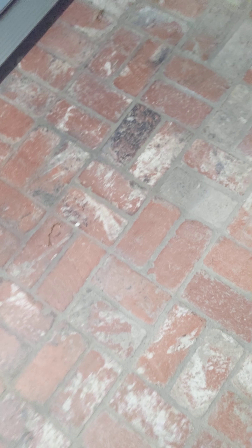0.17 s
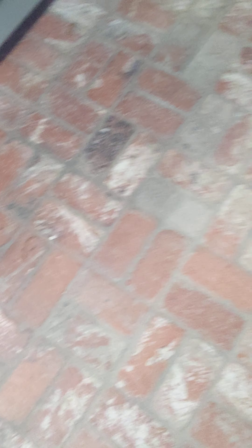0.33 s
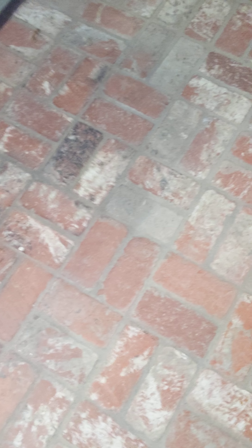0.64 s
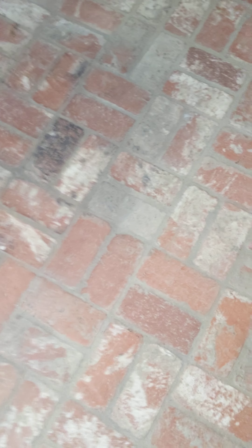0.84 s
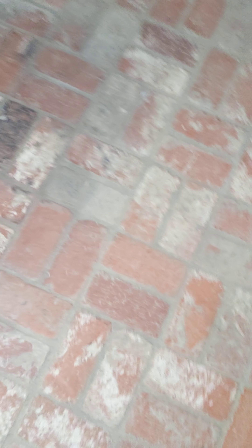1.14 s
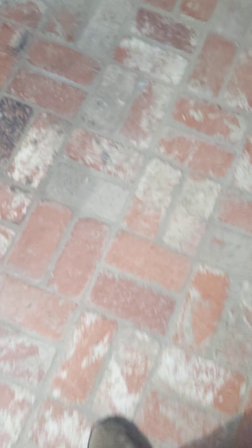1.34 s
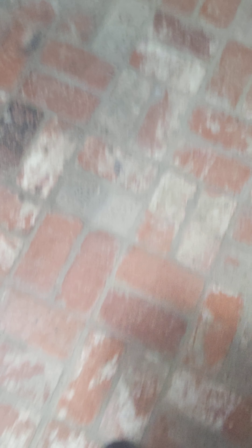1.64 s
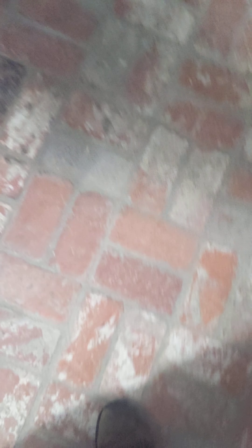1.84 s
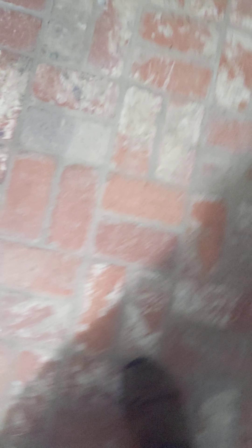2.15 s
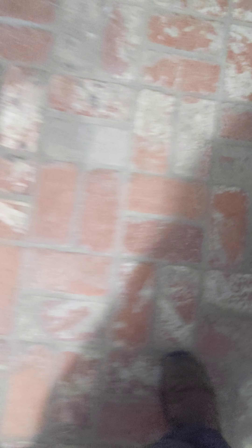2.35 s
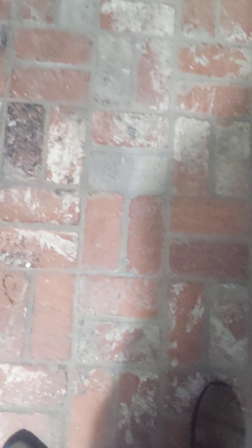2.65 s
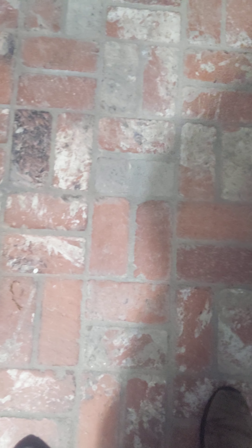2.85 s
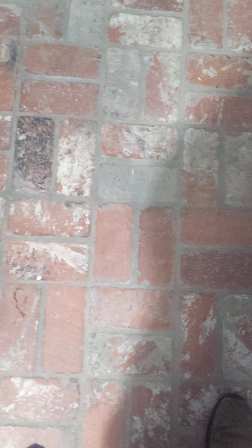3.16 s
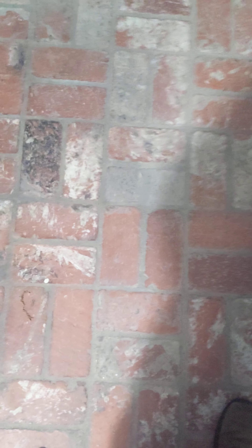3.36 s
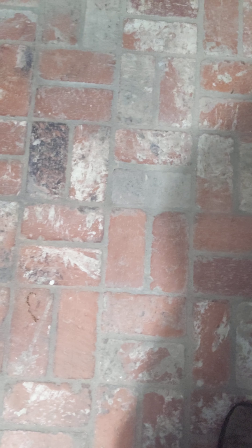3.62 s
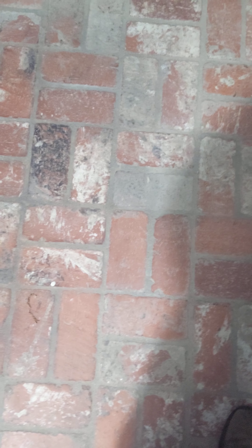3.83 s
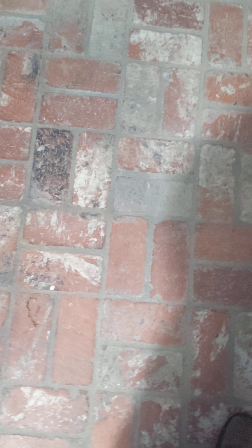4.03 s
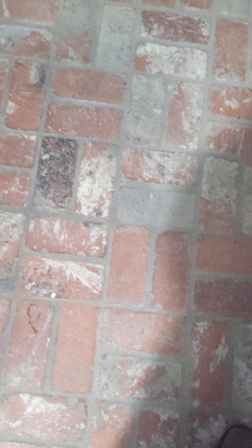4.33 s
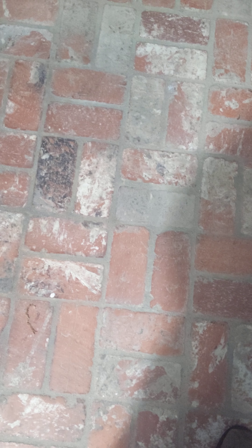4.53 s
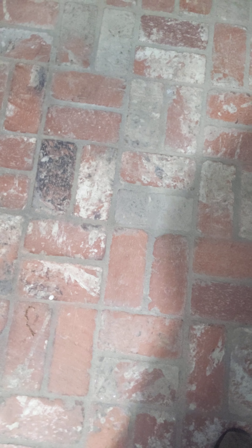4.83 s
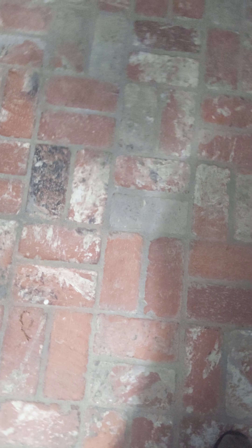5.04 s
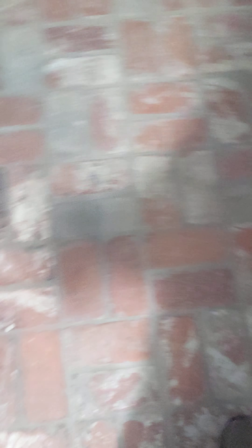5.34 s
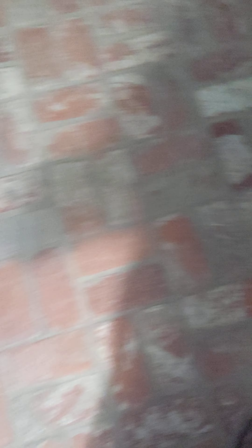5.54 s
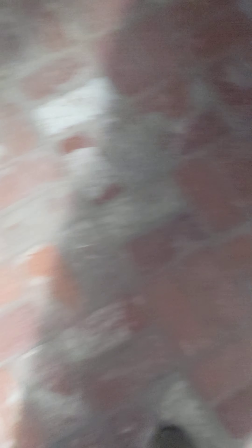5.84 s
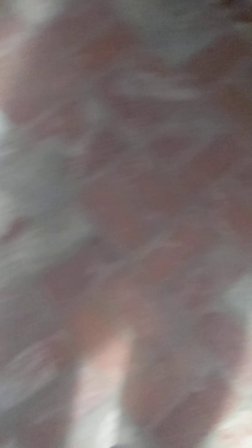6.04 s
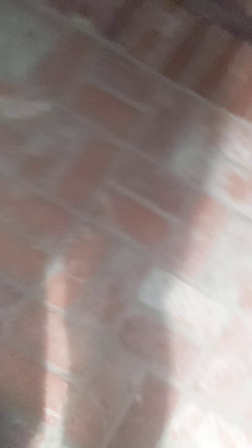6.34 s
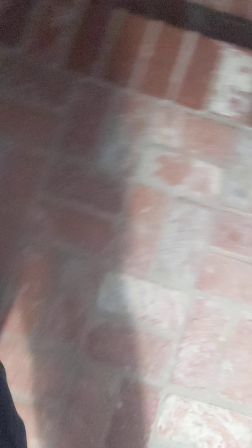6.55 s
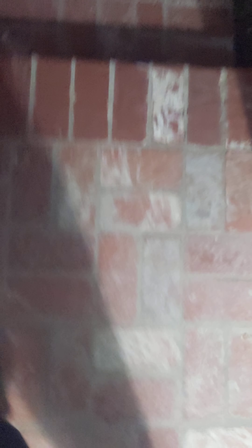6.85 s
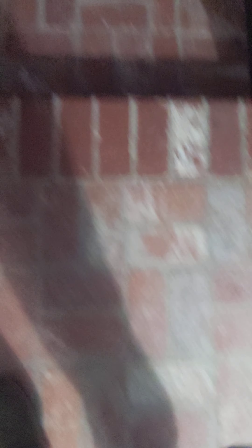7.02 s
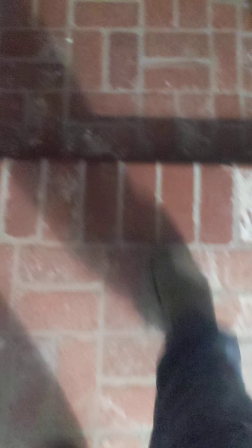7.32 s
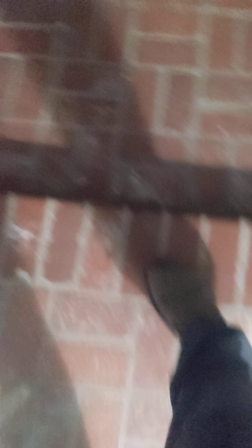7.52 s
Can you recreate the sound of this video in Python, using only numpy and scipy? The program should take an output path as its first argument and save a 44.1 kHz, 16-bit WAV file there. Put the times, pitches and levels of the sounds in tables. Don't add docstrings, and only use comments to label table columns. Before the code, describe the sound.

Outdoors in a walled brick yard, a phone's microphones pick up muffled grip rumbles, cloth hiss and small clicks. A heavy double knock on the case jolts and distorts at about two seconds. Seven crisp, woody heel taps with gritty edges and short diffuse echoes follow at uneven gaps. After a quiet pause, fabric and handling noise return, growing busier towards the end over faint street hum.

```python
import sys
import numpy as np
from scipy import signal
from scipy.fft import rfft, irfft
from scipy.io import wavfile
from scipy.ndimage import uniform_filter1d

SR = 44100
rng = np.random.default_rng(int(sys.argv[2]) if len(sys.argv) > 2 else 0)


def dump(signal):
    limited = np.clip(np.atleast_2d(signal).T, -1, 1)
    pcm = np.round(limited * 32767).astype(np.int16)
    wavfile.write(sys.argv[1], SR, pcm)


def volts_from_decibels(level):
    exponent = np.asarray(level, float) / 20
    return 10 ** exponent


N = 338688
BETWEEN_PORTS = np.array([[1], [-1]])

# start_s, blow_db, sole_db, edge_db, thump_db
HEEL_TAPS = [
    (2.717, -18.5, -9.5, -25, -4),
    (3.048, -13.5, -10, -15.5, -4.5),
    (3.235, -15, -4, -19, -6.5),
    (3.407, -17.5, -7.5, -23, -47),
    (3.769, -12, -2, -9.5, -11),
    (4.461, -16.5, -5.5, -15.5, -4.5),
    (4.802, -14, -3, -10, -4),
    (5.499, -31, -9, -21, -37),
]
RIM_LEVELS = [-24, -16, -10, -16, -16, -17, -21.5, -13]
# pitch_hz, level_db, t60_s
THUMP_MODES = [(186, -3.5, 0.038), (250, -9.5, 0.025)]
# pitch_hz, level_db, t60_s
BRICK_MODES = [(335, 6, 0.044), (401, 0, 0.05), (630, -6, .06), (460, -9.5, 0.15)]
# pitch_hz, level_db, t60_s
SOLE_MODES = [(710, -7.5, 0.053), (817, -8, 0.1), (926, -0.5, 0.035), (999, -3, 0.043), (1168, -3, 0.026)]
# pitch_hz, level_db, t60_s
EDGE_MODES = [(1326, -13, .03), (1440, -5, 0.036), (1774, -9, 0.023), (2324, -14, .025)]
# pitch_hz, level_db, t60_s
RIM_MODES = [(1594, 3.5, 0.049), (2000, -16, .03), (2280, -11.5, 0.051)]
# pitch_hz, level_db, t60_s
GROUND_MODES = [(68, 0, 0.14)]
# pitch_hz, level_db, t60_s
LOOSE_MODES = [(297, 0, .8), (311, -5, .5)]
# delay_s, level_db
BOUNCES = [
    (0, 0),
    (.0105, -15),
]
# frequency_hz, density_db (per Hz)
GRIT_COLOUR = [(1060, -30), (1800, -12), (2460, -0.5), (3480, 1.5), (5540, -8), (6650, -10), (7560, -13),
               (8360, -14), (16000, -24.5)]
# frequency_hz, t60_s
YARD_DECAY = [(120, 0.45), (330, 0.24), (870, 0.33), (2300, 0.27), (6000, 0.69), (12000, 0.29)]
# frequency_hz, likeness (0-1)
YARD_SAME = [(100, 0.93), (400, 0.67), (1000, 0.86), (3000, 0.32), (10000, 0.48)]
# frequency_hz, density_db (per Hz)
YARD_COLOUR = [(20, 0), (20000, 0.0087)]

# start_s, level_db, pitch_hz, cycles to die, way (push +1, pull -1)
CASE_KNOCKS = [(0.093, -22, 45, 1.7, -1), (0.109, -21.5, 236, 2.7, 1), (0.116, -15.5, 218, 1.3, 1),
               (0.129, -25.5, 132, 4.4, 1), (0.339, -38, 447, 6.4, 1), (0.345, -26.5, 465, 45, -1),
               (2.083, -14, 111, 2.2, -1), (2.0944, -5.5, 570, 2.5, 1), (2.0976, -2.5, 406, 2.4, 1),
               (2.098, -5.5, 930, 3, 1), (2.0998, -13.5, 250, 0.86, -1), (2.112, -17, 200, 3.4, 1),
               (2.117, -7, 535, 2.7, 1), (2.1264, -4, 113, 0.97, -1), (2.131, -0.5, 263, 1.56, 1),
               (2.148, -20, 576, 16, 1), (2.204, -33, 524, 17, 1), (2.22, -31, 563, 24, -1),
               (2.287, -21, 35.5, 2.3, -1), (6.047, -19.5, 133, 1.1, -1), (6.236, -18, 167, 1.5, -1),
               (6.248, -30, 187, 4.7, -1), (7.152, -17, 68, 2.4, 1), (7.224, -19, 34.3, 3, 1),
               (0.902, -29, 111, 2.3, 1), (.932, -30, 171, 2.3, 1), (0.9372, -20, 150, 1.7, 1),
               (0.95, -21, 55.6, 2.5, 1), (0.965, -30, 89, 3.8, 1), (1.318, -17.5, 94, 1.9, 1),
               (1.6758, -11.5, 118, 1.15, 1), (2.03, -22, 150, 1.6, 1), (5.6798, -25.5, 407, 3.4, -1),
               (5.692, -33, 150, 2.2, -1), (6.549, -21.5, 32, 2, -1), (6.853, -25, 710, 3.4, 1),
               (6.915, -16, 800, 2.6, 1), (6.952, -10, 660, 4, 1), (7.658, -20, 95, 11, -1)]
# frequency_hz, level_db
TWIST = [(40, -18), (110, -4), (250, 1.5), (580, 2), (900, -11)]
# start_s, level_db, length_s, first_top_hz, last_top_hz
PALM_SLIDES = [
    (2.096, -16, 0.11, 1850, 250),
    (2.135, -22.5, 0.16, 650, 500),
    (2.18, -28, 0.13, 900, 310),
    (9.9, -42, 0.06, 540, 470),
    (7.3, -46, .04, 760, 400),
    (0.57, -38, 0.059, 920, 500),
]
# frequency_hz, density_db (per Hz)
SLIDE_COLOUR = [(90, -28), (240, -6), (400, 8), (650, 0.5), (5000, -17.5)]
# frequency_hz, likeness (0-1)
SLIDE_SAME = [(90, 0.69), (400, 1), (900, 0.23)]
# frequency_hz, left lead (radians)
SLIDE_TURN = [(90, -12.5), (400, -1), (1200, -6)]
# start_s (peak), level_db, rise_s, fall_s
ARM_SWINGS = [(.108, -34, 0.048, 0.12), (.428, -42, 0.13, 0.075), (.946, -33, 0.1, 0.084),
              (1.322, -41.5, 0.059, 0.095), (1.5, -46, 0.37, 0.074), (1.675, -39, 0.043, 0.086),
              (2.0, -41.5, 0.2, 0.36), (2.1, -15, 0.018, 0.036), (2.31, -36, 0.24, 0.077),
              (5.51, -57, 0.085, 0.036), (6.05, -39.5, 0.011, 0.085), (6.57, -36, 0.034, 0.1),
              (6.86, -31.5, 0.13, 0.58), (7.24, -35.5, 0.2, 0.14), (7.6, -45, 0.25, 0.067)]
# start_s (peak), squeeze_db, rise_s, fall_s, rub_db (over the squeeze)
FINGER_SHIFTS = [(.001, -55, .05, 0.24, 4.5), (.108, -37, 0.033, 0.34, -10), (.35, -30, 0.061, 0.092, -4),
                 (.566, -52, 0.88, 0.049, -19), (.68, -45.5, 0.078, 0.046, -13),
                 (.946, -35, 0.11, 0.099, -19), (1.086, -46, 0.016, 0.15, -30),
                 (1.322, -42.5, 0.022, 0.062, -32), (1.388, -52, 0.032, 0.099, 1.5),
                 (1.5, -53, 0.25, 0.11, -20), (1.676, -42.5, 0.035, 0.12, -31),
                 (2.036, -38.5, 0.074, 0.087, -9.5), (2.102, -24, 0.023, 0.093, -11),
                 (2.215, -42, 0.085, 0.11, -10), (5.505, -46, 0.033, 0.082, 3),
                 (5.686, -49.5, 0.019, 0.077, -0.5), (6.24, -33, 0.022, 0.13, -15.5),
                 (6.56, -52, 0.023, 0.81, 4.5), (6.74, -46, 0.081, 0.038, 6),
                 (6.86, -31.5, 0.083, 0.3, -0.5), (6.915, -32.5, 0.095, .04, 0.5),
                 (6.955, -35, 0.0067, 0.14, -2.5), (7.13, -38, 0.84, 0.23, 0.5),
                 (7.22, -38.5, 0.071, 0.059, -1), (7.35, -46.5, 0.24, 0.14, 7), (7.55, -52, 0.22, 1, 8),
                 (7.68, -30, 0.079, .1, -12.5)]
# start_s, level_db
UNREST = [(0, -43), (.5, -51.5), (.85, -57), (1.5, -46.5), (2.05, -54), (2.68, -58), (2.74, -93),
          (5.15, -104), (5.22, -62), (6.4, -70.5), (6.6, -54), (7.68, -39.5)]
# start_s, level_db, pitch_hz, pan_db (left over right)
CASE_BUMPS = [(0.107, -49, 143, -17), (0.344, -49, 457, 2), (0.899, -48, 116, 0), (0.942, -49.5, 166, 30),
              (1.08, -38.5, 243, -0.5), (1.363, -37.5, 105, 3), (1.429, -46, 105, 11),
              (1.487, -51, 102, -6), (1.675, -59, 103, -5), (1.915, -43, 500, 4), (2.094, -20.5, 300, -15),
              (2.128, -25, 150, -4), (5.286, -45, 506, -2.5), (5.682, -52, 300, 7), (6.047, -36, 310, -5),
              (6.236, -29.5, 296, -8), (6.551, -36, 104, -1), (6.953, -25, 620, -2),
              (7.643, -29.5, 105, -1)]
# frequency_hz, density_db (per Hz)
SWAY_COLOUR = [(15, 8.5), (30, -3.5), (60, -4.5), (100, -1.5), (160, -68)]
# frequency_hz, density_db (per Hz)
SQUEEZE_COLOUR = [(60, -22), (100, 7.5), (180, 12.5), (330, 3), (500, -59)]
# frequency_hz, density_db (per Hz)
RUB_COLOUR = [(220, -18), (380, -1), (700, -6), (1000, -11.5), (1250, -19), (1600, -17.5), (3000, -78)]
# frequency_hz, density_db (per Hz)
RATTLE_COLOUR = [(60, -31), (150, 2), (500, 10.0), (900, -2.5), (1400, -21), (3000, -78)]
# frequency_hz, likeness (0-1)
CASE_SAME = [(30, 1), (100, 0.86), (300, 0.76), (800, 0.68), (1500, 1)]
# frequency_hz, left lead (radians)
CASE_TURN = [(30, 1.73), (80, -0.5), (260, -2.5), (600, -3), (1200, -6)]

# start_s (peak), rustle_db, rise_s, fall_s, scrape_db (over the rustle)
SLEEVE_STROKES = [
    (.001, -47, .05, 0.14, -20),
    (.11, -44.5, 0.028, 0.06, -20),
    (.25, -39, 0.26, 0.28, -15.5),
    (.2, -44.5, 0.063, .05, -12),
    (.29, -43.5, 0.026, 0.091, -4),
    (.335, -48.5, 0.13, 0.026, -6),
    (.35, -45.5, 0.095, 0.05, 4),
]
# start_s (peak), rustle_db, rise_s, fall_s, scrape_db (over the rustle)
LEG_STROKES = [(.375, -46.5, 0.0032, 0.0054, 12.5), (.382, -60, .006, 0.065, 0),
               (.535, -52.5, 0.004, 0.023, -1.5), (.56, -60, .03, .06, -6), (1.2, -66, 0.33, 0.22, -8),
               (1.366, -45.5, 0.005, 0.2, -12.5), (1.64, -56.5, 0.62, 0.093, -8),
               (1.98, -56.5, 0.093, 0.34, -9), (2.534, -50.5, 0.082, 0.25, -8.5),
               (2.568, -49, 0.085, 0.12, -19), (2.71, -67, 0.085, .05, -9), (5.34, -67.5, 0.46, 0.19, -4),
               (5.509, -51.5, 0.039, 0.1, 2), (6.237, -52.5, 0.0067, 0.13, -3),
               (6.31, -48.5, 0.14, 0.019, -16), (6.6, -55.5, 0.26, 0.18, -14),
               (6.741, -47.5, 0.2, 0.013, 0), (6.86, -38.5, 0.067, 0.18, 1.5),
               (6.92, -44, 0.25, 0.045, 7.5), (6.953, -50, 0.0055, 0.4, 7.5), (7.1, -37, 0.23, 0.38, -1.5),
               (7.35, -50, 0.11, 0.058, 6.5), (7.389, -44.5, 0.0068, 0.088, -16),
               (7.551, -47, 0.14, 0.17, 0.5), (7.646, -41.5, 0.005, 0.011, 4),
               (7.659, -52, 0.009, 0.0058, 16.5)]
# start_s, level_db
SWISH = [(0, -63), (.35, -53), (.37, -65), (.72, -70.5), (1.7, -65), (2.16, -72), (2.25, -64), (2.7, -74.5),
         (2.76, -100), (5.05, -100), (5.12, -80), (5.63, -69.5), (6.45, -65.5), (7.68, -81)]
# start_s, level_db, pan_db (left over right)
TICKS = [(0.0554, -53, 0), (0.0944, -29, 11), (.1775, -47, 0), (0.373, -30, -4), (.4559, -50, 4),
         (0.673, -39, 1), (0.5323, -40, -9), (.536, -42, -5), (1.366, -47, 8), (1.561, -26.5, 4),
         (1.656, -36, 5), (1.96, -35, 7), (2.095, -24.5, 15), (2.102, -26, -7), (4.52, -53, 2),
         (4.551, -52, 2), (4.596, -51, 2), (5.504, -39, 4), (6.0475, -41, -15), (6.237, -29, -13),
         (6.5986, -29, 21), (6.791, -39, 8), (6.816, -38, 2), (6.9499, -32, 3), (7.3476, -27, -6),
         (7.3855, -29, -2), (7.3884, -49, 8), (7.392, -37, 5), (7.418, -33.5, 16), (7.433, -28, 8),
         (7.5485, -33, 0), (7.5333, -49, 7), (7.5614, -45, 6), (7.616, -41, -1), (7.644, -45, -7)]
# frequency_hz, density_db (per Hz)
SLEEVE_COLOUR = [(800, -30), (1400, -14), (2400, -18), (3300, -19), (3950, 2), (4700, -14), (5700, 0),
                 (6800, -10), (7800, -5), (8600, -14), (9500, -14), (10800, -18), (12500, -20),
                 (13600, -17), (16000, -21)]
# frequency_hz, density_db (per Hz)
LEGS_COLOUR = [(800, -41), (1100, -4), (2200, -13), (3400, 3.5), (4900, 3.5), (5700, 6), (6700, -3),
               (9000, -15), (12400, -22), (13700, -17.5), (16000, -21)]
# frequency_hz, likeness (0-1)
SLEEVE_SAME = [(1000, 0.51), (3000, 0.54), (5700, 0.7), (10000, 0.12), (15000, 0.15)]
# frequency_hz, likeness (0-1)
LEGS_SAME = [(1000, .4), (3500, .6), (5700, .75), (7500, .5), (10000, .35), (15000, .2)]
# frequency_hz, shade_db (left over right), left lead (radians)
FROM_PATH = [(150, 2, 0), (450, 3, .3), (800, 7, 1.2), (1100, 6, 3.3), (1450, 8, 5), (1750, 5, 6.4),
             (5000, 3.5, 6.4), (9500, 4, 6.4), (11500, 0, 6.4), (13500, 7, 6.4)]
FROM_SLEEVE = [(700, -2, -.6), (1400, -10, -1), (2700, -12, -1), (3900, 0, .7), (5700, -2, 3.8),
               (6600, 6, 6), (7800, -2, 8.2), (9200, -12, 12.1), (12000, -4, 19.5), (15000, -1, 27)]
FROM_LEGS = [(1000, 4, 0), (2500, 1.5, 0), (4800, 4.5, 0), (9000, 3, 0), (12000, 0, 0), (13600, 6.5, 0)]
# frequency_hz, density_db (per Hz)
STREET_COLOUR = [(15, -4.5), (32, -3), (62, -1.5), (95, -26), (170, -16.5), (300, -28.5), (800, -26),
                 (2000, -41.5), (3600, -36.5), (4700, -41), (5700, -39), (6600, -46.5), (7500, -41.5),
                 (8500, -46.5), (12500, -51.5), (16000, -45.5)]
# frequency_hz, likeness (0-1)
STREET_SAME = [(50, 0.99), (200, 0.67), (800, 0.61), (3000, 0.15), (10000, 0.37)]


def heels():
    free_s, damp_db_per_s, damp_db = .012, 2000, 9
    ground_rise_s, bounce_spread = .012, 4
    loose_db = -24
    grit_db, grit_per_db = -33, 0.96
    t, out = np.arange(SR * 2 // 5) / SR, np.zeros((2, N))
    detune = rng.normal(1, 0.01, (len(HEEL_TAPS), 5))
    grit = noise(GRIT_COLOUR, YARD_SAME, size=256, count=len(t) * len(HEEL_TAPS))
    grit = grit.reshape(2, len(HEEL_TAPS), -1)
    damping = volts_from_decibels(-np.minimum(damp_db_per_s * np.maximum(t - free_s, 0), damp_db))
    scatter = (1 - np.exp(-t / 0.0015)) * (volts_from_decibels(-60 * t / 0.47) + volts_from_decibels(1.5 - 60 * t / 0.22))
    fade = np.hanning(2 * len(t))[len(t):] ** .3
    for k, (s, db, sole_db, edge_db, thump_db) in enumerate(HEEL_TAPS):
        d = detune[k]
        blow = ring(BRICK_MODES, t, d)
        blow += volts_from_decibels(sole_db) * ring(SOLE_MODES, t, d)
        blow += volts_from_decibels(edge_db) * ring(EDGE_MODES, t, d)
        blow += volts_from_decibels(RIM_LEVELS[k]) * ring(RIM_MODES, t, d)
        blow += volts_from_decibels(thump_db) * ring(THUMP_MODES, t, d)
        blow += volts_from_decibels(-8) * ring(GROUND_MODES, t, d) * np.minimum(t / ground_rise_s, 1)
        blow *= (1 - np.exp(-t / 0.00084)) * damping
        knock = np.zeros(len(t))
        for j, (delay, bounce_db) in enumerate(BOUNCES):
            add(knock, delay * d[j] ** (bounce_spread * j / 2), -volts_from_decibels(db + bounce_db) * blow)
        add(out, s - .001, knock[None])
        echo = signal.fftconvolve(blow[None], yard(), axes=1)
        add(out, s - .001, volts_from_decibels(db - 1.9) * echo)
        add(out, s, volts_from_decibels(db + loose_db) * ring(LOOSE_MODES, t, d ** .1) * fade)
        add(out, s, volts_from_decibels(grit_db + grit_per_db * db) * scatter * grit[:, k])
    return out


def ring(modes, t, detune):
    x = np.zeros(len(t))
    for k, (hz, db, t60) in enumerate(modes):
        x += (-1) ** k * volts_from_decibels(db - 60 * t / t60) * np.sin(2 * np.pi * hz * detune[k] * t)
    return x / abs(x).max()


def yard():
    tail = noise(YARD_COLOUR, YARD_SAME, size=256, count=SR // 2)
    hz, t, z = signal.stft(tail, SR, nperseg=256)
    tail = signal.istft(z * volts_from_decibels(-60 * t / read(YARD_DECAY, hz)[:, None]), SR, nperseg=256)[1]
    tail = tail * np.clip(np.arange(tail.shape[1]) / SR / 0.00048 - .5, 0, 1)
    return tail / np.linalg.norm(tail[0])


def knocks_in_case():
    t, out = np.arange(SR // 8) / SR, np.zeros((2, N))
    for s, db, hz, cycles, way in CASE_KNOCKS:
        late = left_follows(t, hz, 5.5)
        swing = np.sin(2 * np.pi * hz * late) * volts_from_decibels(db - 3.5 - 60 * late * hz / (2 * cycles))
        swing *= 1 - np.exp(-9 * late * hz)
        twist = volts_from_decibels(read(TWIST, hz)) * swing[1] * BETWEEN_PORTS
        add(out, s, way * (swing + twist) * volts_from_decibels(-.7 * BETWEEN_PORTS))
    return out


def slides():
    fade_db, edge_db_per_octave = -8.5, -51
    out = np.zeros((2, N))
    for s, db, length, first_hz, last_hz in PALM_SLIDES:
        scrape = noise(SLIDE_COLOUR, SLIDE_SAME, SLIDE_TURN, size=256, count=SR // 4, flicker_db=2.5)
        hz, t, z = signal.stft(scrape, SR, nperseg=256, noverlap=192)
        top_hz = last_hz + (first_hz - last_hz) * np.exp(-2.5 * t / length)
        over = np.maximum(np.log2((hz[:, None] + 1) / top_hz), 0)
        scrape = signal.istft(z * volts_from_decibels(edge_db_per_octave * over), SR, nperseg=256, noverlap=192)[1]
        u = np.arange(scrape.shape[1]) / SR / length
        fade = volts_from_decibels(db + fade_db * np.sqrt(u) - 34 * u ** 6) * np.minimum(u * 12, 1)
        add(out, s, fade * scrape)
    return out


def grip():
    unrest = follow(UNREST)
    squeeze, rubbing = strokes(FINGER_SHIFTS)
    squeeze = np.hypot(squeeze, volts_from_decibels(-5) * unrest)
    rubbing = np.hypot(rubbing, volts_from_decibels(-12) * unrest)
    swing = np.hypot(strokes(ARM_SWINGS)[0], unrest)
    out = volts_from_decibels(4.5) * swing * noise(SWAY_COLOUR, CASE_SAME, CASE_TURN, size=4096)
    out += volts_from_decibels(3.5) * squeeze * noise(SQUEEZE_COLOUR, CASE_SAME, CASE_TURN, flicker_db=3.5)
    rub = noise(RUB_COLOUR, CASE_SAME, CASE_TURN, size=512, patchy_db=2.5, flicker_db=2.5)
    bright_db = .6 * (np.minimum(20 * np.log10(rubbing), -28) + 30) - 4
    out += volts_from_decibels(5.5) * rubbing * (band(rub, 187, 933) + volts_from_decibels(bright_db) * band(rub, 690, 2800))
    bumps(out)
    return out


def bumps(out):
    rattle_db, rattle_t60_s = -3.5, .08
    t = np.arange(SR // 4) / SR
    rattle = noise(RATTLE_COLOUR, CASE_SAME, CASE_TURN, size=512, count=len(t) * len(CASE_BUMPS))
    for (s, db, hz, pan_db), shake in zip(CASE_BUMPS, np.split(rattle, len(CASE_BUMPS), axis=1)):
        late = left_follows(t, hz, 6)
        push = np.sin(2 * np.pi * hz * late) * volts_from_decibels(-60 * late * hz / 1.15)
        sound = push + volts_from_decibels(rattle_db - 60 * t / rattle_t60_s) * shake
        sound *= 1 - np.exp(-t / 0.00097)
        add(out, s, volts_from_decibels(db + 7 + pan_db / 2 * BETWEEN_PORTS) * sound)


def clothes():
    sleeve_ends_s, sleeve_lift_s = .365, .008
    sleeve_sheen_db, legs_sheen_db, sheen_per_db = -15.5, -7, -0.15
    swish, cut = follow(SWISH), round(sleeve_ends_s * SR)
    touch = np.clip((sleeve_ends_s - np.arange(N) / SR) / sleeve_lift_s, 0, 1)
    rustle, drag = np.hypot(touch * np.array(strokes(SLEEVE_STROKES)), strokes(LEG_STROKES))
    rustle, drag = np.hypot(rustle, swish), np.hypot(drag, volts_from_decibels(-2) * swish)
    grain = volts_from_decibels(1.5 * evened(uniform_filter1d(rng.standard_normal(N), size=120)))
    parts = []
    for colour, same, way, n in ((SLEEVE_COLOUR, SLEEVE_SAME, FROM_SLEEVE, cut),
                                 (LEGS_COLOUR, LEGS_SAME, FROM_LEGS, N - cut)):
        hiss = ports(noise(colour, same, size=256, count=n, patchy_db=2.3, flicker_db=1.0), way)
        parts.append([band(hiss, 2600, 8400), band(hiss, 8400, 17000), band(hiss, 950, 2600)])
    body, sheen, scrape = np.concatenate(parts, axis=2)
    sheen_db = np.where(np.arange(N) < cut, sleeve_sheen_db, legs_sheen_db)
    sheen_db = sheen_db + sheen_per_db * (20 * np.log10(rustle) + 40)
    out = rustle * (body + volts_from_decibels(sheen_db) * sheen) + volts_from_decibels(0.5) * drag * evened(grain * scrape)
    out = volts_from_decibels(0.5) * out
    ticks(out)
    return out


def ticks(out):
    t = np.arange(300) / SR
    snaps = band(rng.standard_normal((len(TICKS), 300)), 1700, 11300)
    for (s, db, pan_db), snap in zip(TICKS, snaps):
        tick = snap * volts_from_decibels(-60 * t / 0.0013) * (1 - np.exp(-t / 0.00016))
        add(out, s, volts_from_decibels(db + 4.0 + pan_db / 2 * BETWEEN_PORTS) * tick)


def street():
    hum = noise(STREET_COLOUR, STREET_SAME, size=2048, patchy_db=1.3, flicker_db=.5)
    return volts_from_decibels(-54.5 + 6.0) * hum


def ports(x, way):
    hz, (f, shade_db, turn) = np.fft.rfftfreq(x.shape[1], 1 / SR), np.transpose(way)
    right = rfft(x[1]) * volts_from_decibels(-np.interp(hz, f, shade_db)) * np.exp(-1j * np.interp(hz, f, turn))
    return np.array([x[0], irfft(right, x.shape[1])])


def left_follows(t, hz, divisor):
    shift = np.array([[read(CASE_TURN, hz) / (divisor * np.pi * hz)], [0]])
    return np.maximum(t + shift, 0)


def noise(colour, same, turn=((1, 0), (2, 0)), size=1024, count=N, patchy_db=0., flicker_db=0.):
    hop = size // 4
    frames, hz = count // hop + 5, np.fft.rfftfreq(size, 1 / SR)
    a, b, c, d, patches = rng.standard_normal((frames, len(hz), 5), dtype=np.float32).T
    flicker = evened(patches[0])
    patches = uniform_filter1d(uniform_filter1d(patches, size=8, axis=0), size=8, axis=1)
    like = np.clip(read(same, hz), -1, 1)[:, None]
    right = a + 1j * b
    left = like * right * np.exp(1j * read(turn, hz))[:, None] + np.sqrt(1 - like ** 2) * (c + 1j * d)
    level_db = read(colour, hz)[:, None] + patchy_db * evened(patches) + flicker_db * flicker
    z = np.array([left, right]) * volts_from_decibels(level_db)
    return evened(signal.istft(z, nperseg=size, noverlap=size - hop)[1][:, :count])


def strokes(rows):
    drop_db, roundness = 28, 1.152
    t, power = np.arange(0, N + 64, 32) / SR, 0
    for s, db, rise, fall, *extra_db in rows:
        away = np.where(t < s, (s - t) / rise, (t - s) / fall)
        power = power + volts_from_decibels(db - drop_db * away ** roundness + np.array([0, *extra_db])[:, None]) ** 2
    return [np.interp(np.arange(N) / SR, t, np.sqrt(p)) for p in power]


def follow(curve):
    s, db = np.transpose(curve)
    return volts_from_decibels(np.interp(np.arange(N) / SR, s, db))


def band(x, lo_hz, hi_hz):
    return evened(signal.sosfilt(signal.butter(4, [lo_hz, hi_hz], "band", fs=SR, output="sos"), x))


def evened(x):
    return x / np.sqrt(np.mean(x ** 2) + 1e-20)


def read(points, hz):
    f, value = np.transpose(points)
    return np.interp(np.log(hz + 1), np.log(f + 1), value)


def add(mix, s, sound):
    part = mix[..., round(s * SR):][..., :sound.shape[-1]]
    part += sound[..., :part.shape[-1]]


def scene():
    air = ports(heels() + street(), FROM_PATH) + clothes()
    air[0] = np.roll(air[0], 24)
    return air + knocks_in_case() + slides() + grip() * volts_from_decibels(.8 * BETWEEN_PORTS)


def band_limit(x):
    return signal.sosfilt(signal.butter(12, 16240, fs=SR, output="sos"), x)


def record(dry):
    ceiling, edge_hz = .69, 15900
    dry = dry / (1 + (abs(dry) / ceiling) ** 6) ** (1 / 6)
    lowpass = signal.firwin(401, edge_hz, window=("kaiser", 9), fs=SR)
    mix = signal.oaconvolve(dry, lowpass[None], "same")
    return band_limit(mix)


dry = scene()
out = record(dry)
dump(out)
```